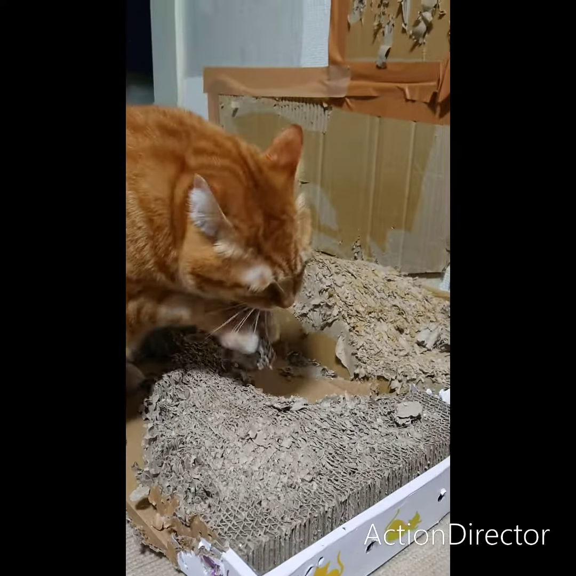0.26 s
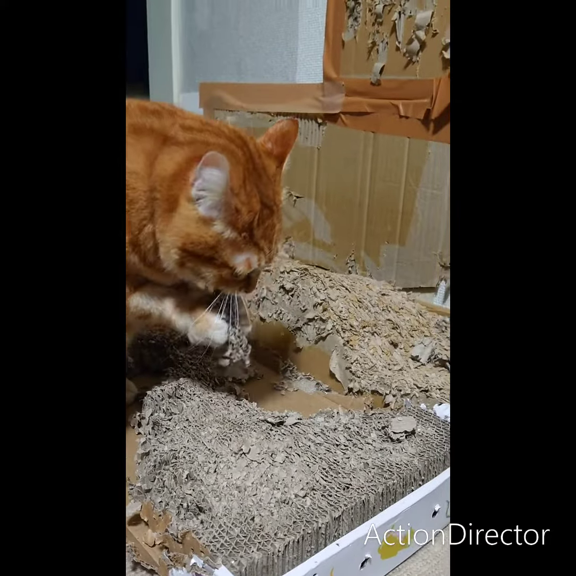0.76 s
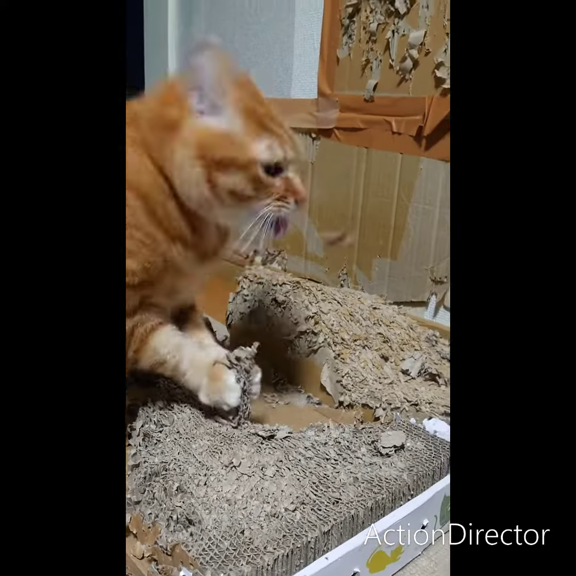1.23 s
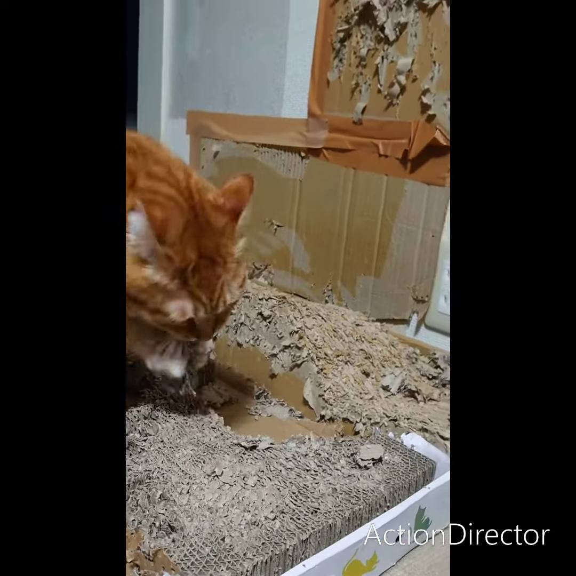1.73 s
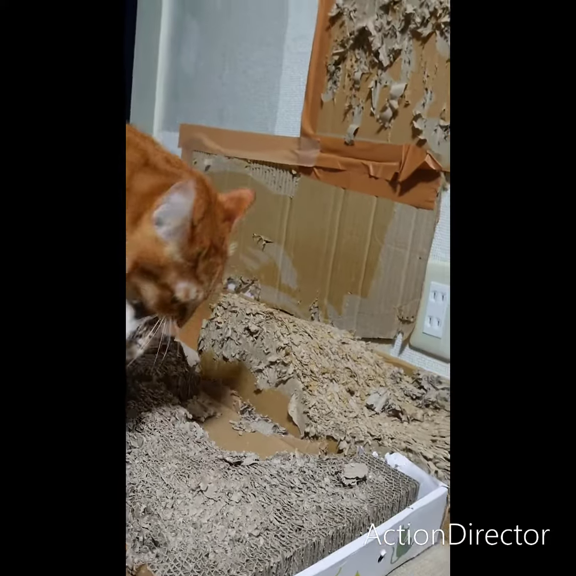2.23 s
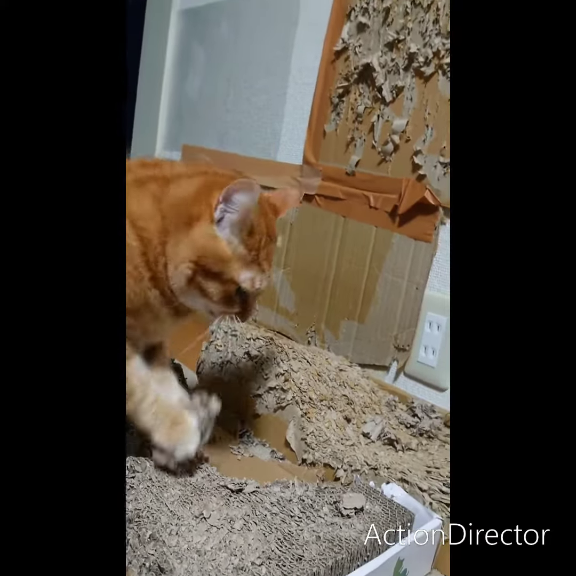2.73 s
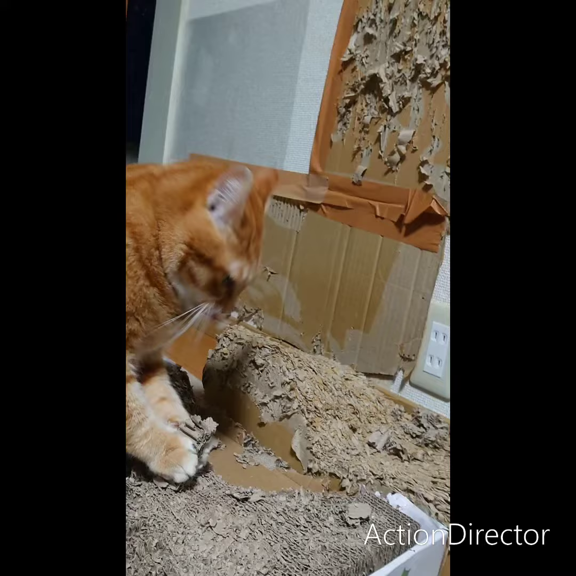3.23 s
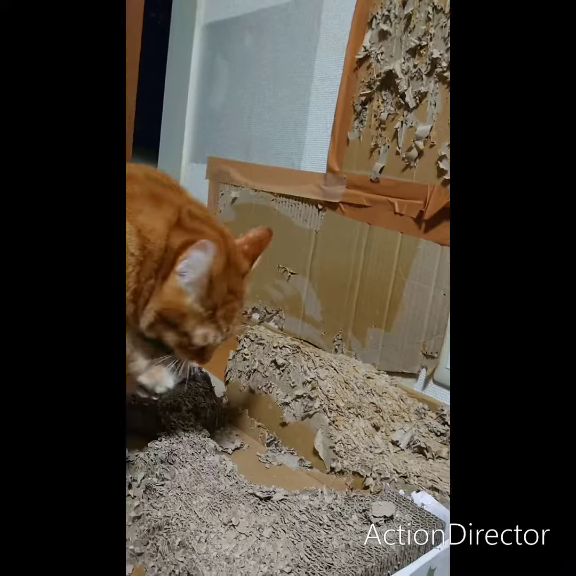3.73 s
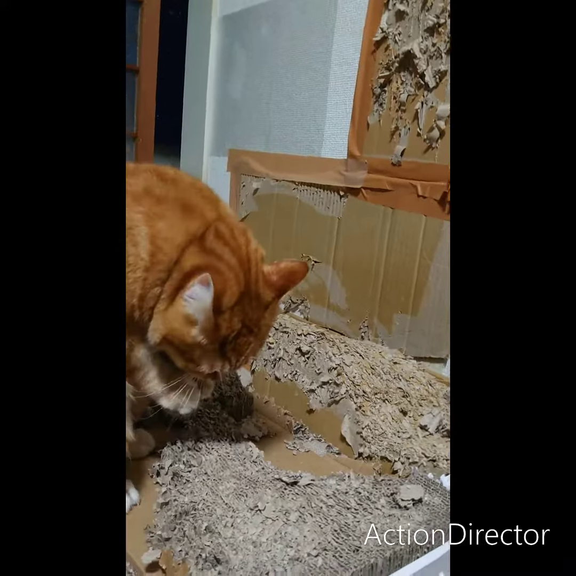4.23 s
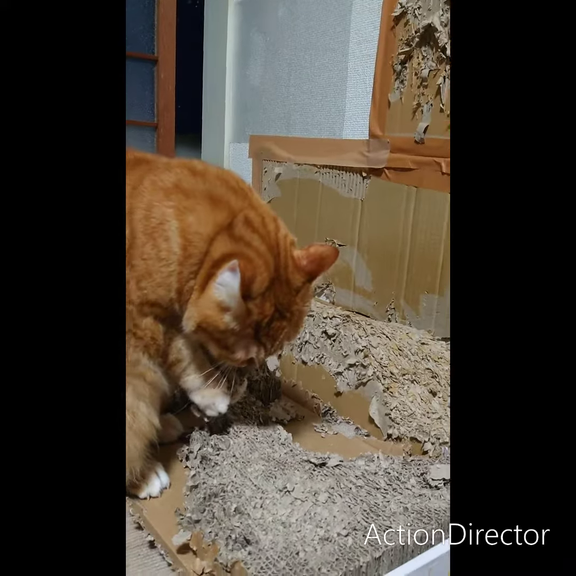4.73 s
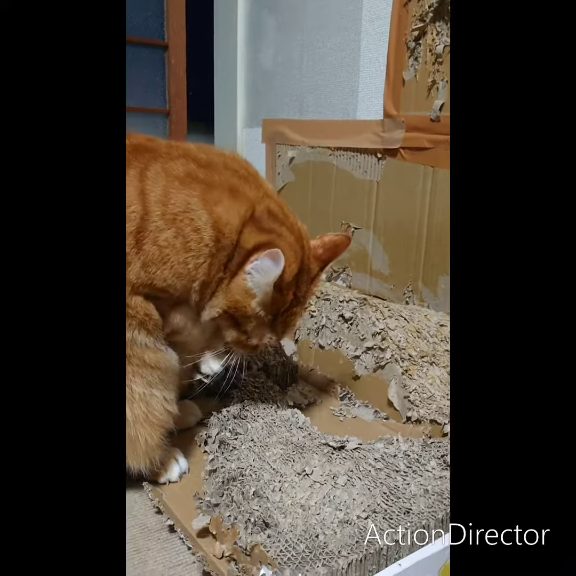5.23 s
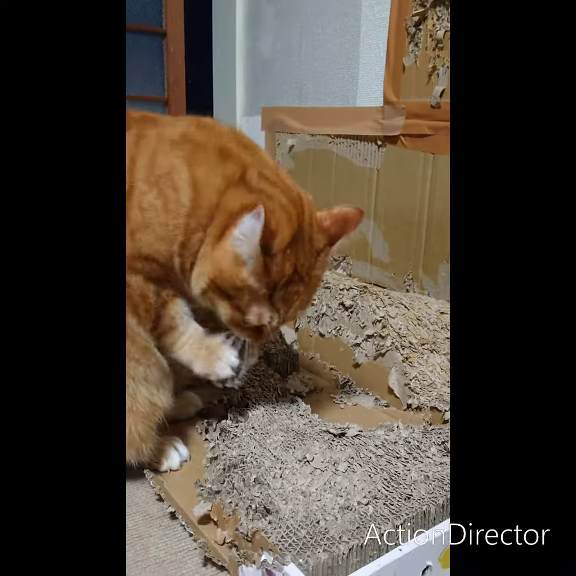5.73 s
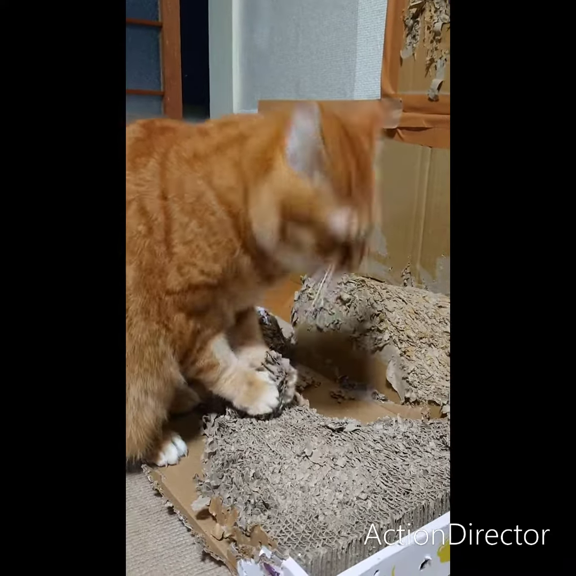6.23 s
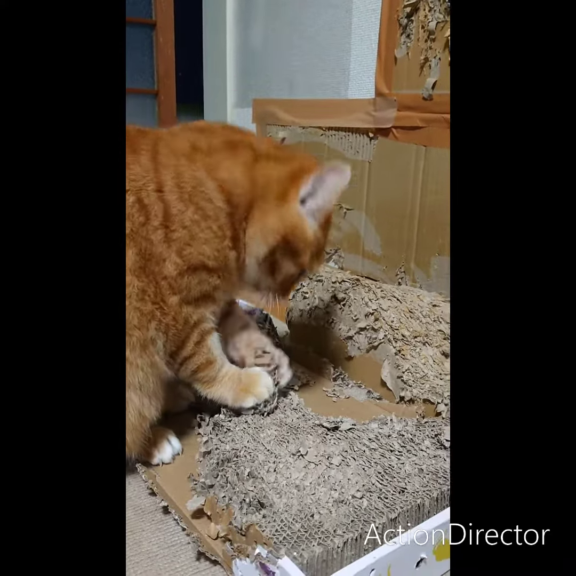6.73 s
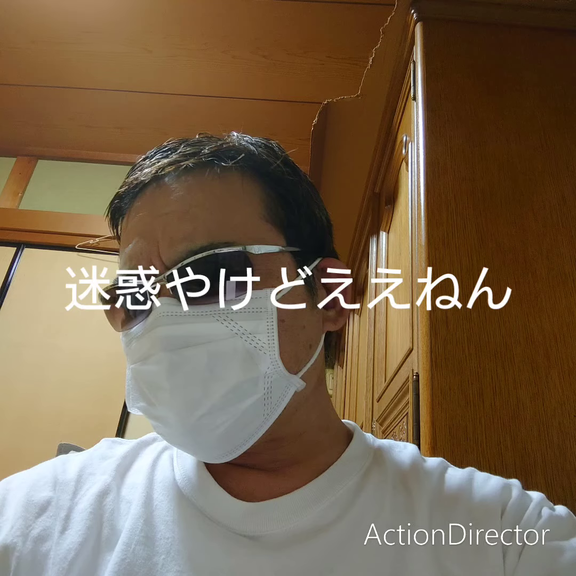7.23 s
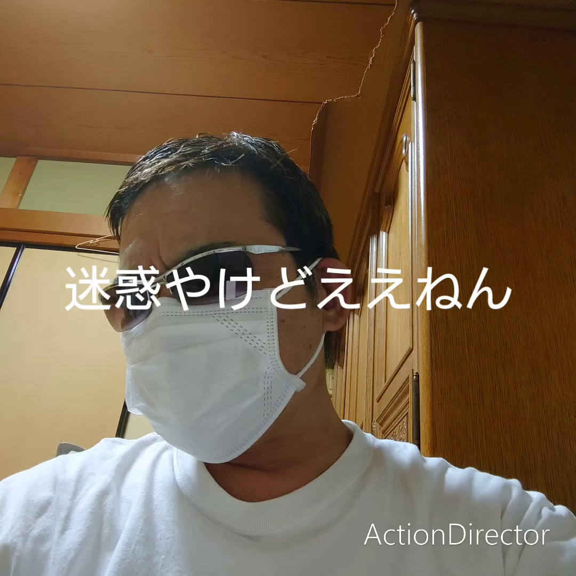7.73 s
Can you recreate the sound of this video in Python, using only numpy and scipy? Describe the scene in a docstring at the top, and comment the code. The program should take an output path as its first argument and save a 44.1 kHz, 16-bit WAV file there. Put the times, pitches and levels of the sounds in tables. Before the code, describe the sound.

Crisp cardboard rips and sharp cracks, papery rustling and a few dull thumps in a small room with low hum, cutting abruptly to silence.

```python
"""A cat bites and claws pieces off a corrugated cardboard scratching pad in a small room.
From the start an appliance hums (wavering sines) in rushing air (shaped noise), and shreds rustle
(clumped random slips). Paper walls snap and rip (bursts of fibre fractures), paws scuff (dull grains),
and from 1.1 s on a paw lands on the hollow pad with a thump (decaying sines).
At 7.24 s the sound is switched off, and silence follows."""
import sys
import numpy as np
from scipy import signal
from scipy.fft import rfft, irfft
from scipy.io import wavfile

SR = 44100
rng = np.random.default_rng(int(sys.argv[2]) if len(sys.argv) > 2 else 0)


def wav_out(sig):
    """Save sig, one row per channel (or a flat mono array), as 16-bit PCM at SR to the path in sys.argv[1]."""
    wavfile.write(sys.argv[1], SR, np.round(np.clip(np.atleast_2d(sig).T, -1, 1) * 32767).astype(np.int16))


N = 351918
OFF_S = 7.242


def from_db(db):
    """Amplitude ratio of a level in dB."""
    return 10 ** (np.asarray(db) / 20)


def rms_one(x):
    """Scale to an RMS of 1."""
    return x / np.sqrt(np.mean(x ** 2) + 1e-20)


def at_hz(points, hz):
    """Read a spectrum on a log-frequency axis."""
    known_hz, values = np.transpose(points)
    return np.interp(np.log(hz + 1e-3), np.log(known_hz), values)


def colour(x, points, share=1, size=8192):
    """Causal (minimum-phase) filter with share times the given dB shape."""
    shape_db = share * at_hz(points, np.fft.rfftfreq(size, 1 / SR))
    cepstrum = irfft(np.log(from_db(shape_db)))
    # fold the cepstrum onto positive time: minimum phase
    cepstrum[1:size // 2] *= 2
    cepstrum[size // 2 + 1:] = 0
    response = irfft(np.exp(rfft(cepstrum)))
    response = response.reshape((1,) * (x.ndim - 1) + (-1,))
    return signal.oaconvolve(x, response, axes=-1)[..., :x.shape[-1]]


def place(pair, tilt):
    """Tilt left against right, frequency by frequency, by 1.202 times the dB in tilt."""
    left = colour(pair[0], tilt, .5)
    right = colour(pair[1], tilt, -0.702)
    return np.array([left, right])


def resonance(x, hz, width_hz):
    """Two-pole band-pass."""
    r = np.exp(-np.pi * width_hz / SR)
    zeros = [(1 - r * r) / 2, 0, (r * r - 1) / 2]
    poles = [1, -2 * r * np.cos(2 * np.pi * hz / SR), r * r]
    return signal.lfilter(zeros, poles, x + 1e-18)


def band_rms(x, low_hz, high_hz):
    """Level of the part of x inside a band."""
    band = signal.butter(2, [low_hz, high_hz], "band", fs=SR, output="sos")
    return np.std(signal.sosfilt(band, x))


def add(track, start_s, sound):
    """Mix a short sound into a track."""
    start = int(start_s * SR)
    track[..., max(start, 0):start + sound.shape[-1]] += sound[..., max(-start, 0):N - start]


def drift(per_s, size=4000):
    """Slow random wander: straight lines between normal draws of spread 1, per_s draws a second."""
    return np.interp(np.arange(N) / SR * per_s, np.arange(size), rng.standard_normal(size))


def two_ways(size, unlike):
    """Crumpled paper radiates unevenly: each fracture reaches left and right with its own strength."""
    return (1 + unlike * rng.standard_normal((2, size))) / np.sqrt(1 + unlike ** 2)


def hum(waver_db=.8, waver_hz=0.421):
    """Steady tones of the appliance's motor and fan, wavering a little in level and speed."""
    # tones: pitch_hz, level_db, left_minus_right_db
    tones = [(31.65, -61, -10), (63.08, -62.5, -3.5), (73.27, -56, -2), (94.7, -61, 1),
             (100.66, -71.5, -5.5), (171.8, -80, 0.5), (261.2, -86, 0.5), (519.2, -85.5, 14),
             (548.04, -79, 22), (585.5, -89, 23)]
    out = np.zeros((2, N))
    for hz, level_db, side_db in tones:
        cycles = np.cumsum(hz + waver_hz * drift(1.98)) / SR
        tone = np.sqrt(2) * np.sin(2 * np.pi * (rng.random() + cycles))
        pan_db = side_db * np.array([[.5], [-.5]])
        out += from_db(level_db + waver_db * drift(3.3) + pan_db) * tone
    return out


def air(level_db=-68.5):
    """Even rush and rumble of moving air, alike on both sides only in the bass."""
    # noise spectrum: freq_hz, relative_db_per_hz
    rush = [(20, 13), (50, 13), (66, 21.5), (90, 11), (125, 8.5), (175, -0.5), (240, -9), (330, -1),
            (550, -0.5), (750, -4.5), (1320, -10), (2100, -10), (5800, -28), (15000, -29.5)]
    # left against right, before the scaling in place(): freq_hz, tilt_db
    air_tilt = [(60, -7.5), (200, -5.5), (380, 3.5), (700, 7.5), (1300, 1), (2400, 7.5), (4400, 3),
                (15000, 3.5)]
    # left-right likeness: freq_hz, likeness_0_to_1
    likeness = [(100, 0.9), (250, .7), (600, .4), (1500, 0), (10000, .05)]
    alike = np.clip(at_hz(likeness, np.fft.rfftfreq(N, 1 / SR)), 0, 1)
    mid, side = rfft(rng.standard_normal((2, N)))
    pair = irfft(np.sqrt(1 + alike) * mid + np.sqrt(1 - alike) * side * [[1], [-1]], N)
    pair = place(colour(pair, rush), air_tilt)
    return from_db(level_db) * pair / band_rms(pair.mean(axis=0), 300, 1500)


def stirring(settle=1.3, rest_rub_db=-85, rest_crackle_db=-90):
    """Gains of rub and crackle: strokes swell, settle more slowly, and add in power where they overlap."""
    # a paw or the chin pushes through the shreds: peak_s, relative_level_db, swell_s, crackle_re_rub_db
    strokes = [ (.01, -65.5, 0.0262, -6), (.36, -78, .035, 2), (.48, -71.5, .05, -3), (.74, -79, .09, -3),
               (1.065, -66.5, 0.0697, -2), (1.209, -64, 0.0177, -2.5), (1.422, -70.5, 0.0414, 0),
               (1.563, -63.5, 0.017, -1), (1.842, -69.5, 0.058, -2.5), (2.029, -67, 0.0723, -12),
               (2.297, -65, 0.0567, -3), (2.517, -63, 0.0696, -2.5), (2.713, -65, 0.0545, -3.5),
               (2.954, -71, 0.027, 0.5), (3.13, -71.5, 0.0339, -1.5), (3.27, -73, .025, -5),
               (3.408, -61.5, 0.0217, -5), (3.62, -75, .07, -3), (3.754, -72.5, 0.022, 13),
               (3.888, -71, 0.082, -3), (4.146, -66.5, 0.051, -16), (4.347, -64.5, 0.0348, -11),
               (4.45, -70.5, 0.0273, 1), (4.63, -70, 0.063, -23.5), (5.108, -67.5, 0.0428, 0.5),
               (5.32, -70, .06, -6), (5.48, -75, .025, 1), (5.771, -66, 0.0677, -7),
               (5.951, -60.5, 0.0278, 1.5), (6.063, -65.5, 0.0182, -4.5), (6.192, -57.5, 0.0262, -3.5),
               (6.458, -72, 0.0335, -4.5), (6.578, -72, 0.0202, -5), (6.865, -59, 0.0249, -2)]
    t = np.arange(0, N, 32) / SR
    # the cat's weight keeps the pile stirring between strokes
    rub, crackle = from_db(rest_rub_db) ** 2, from_db(rest_crackle_db) ** 2
    for s, level_db, swell_s, crackle_db in strokes:
        away = np.maximum(s - t, (t - s) / settle) / swell_s
        push = from_db(level_db) * 2 / (np.exp(np.minimum(away, 20)) + np.exp(-away))
        rub = rub + push ** 2
        crackle = crackle + (push * from_db(crackle_db)) ** 2
    return [np.interp(np.arange(N) / SR, t, np.sqrt(power)) for power in (rub, crackle)]


def grains(per_s, spread_db, smooth, clump_db=2, clumps_per_s=120, unlike=1.0):
    """Countless tiny slips of uneven size, coming in clumps over a smooth rub."""
    slips, clumps = np.zeros((2, N)), drift(clumps_per_s)
    rub = smooth * rng.standard_normal((2, N))
    at = np.flatnonzero(rng.random(N) < per_s / SR)
    sizes_db = spread_db * np.minimum(rng.exponential(1, len(at)), 4) + clump_db * clumps[at]
    signs = rng.choice([-1, 1], len(at))
    slips[:, at] = from_db(sizes_db) * signs * two_ways(len(at), unlike)
    return rms_one(slips) + rub


def rustle(rub_gain, fine_gain, rub_db=-2):
    """Shreds slide over each other, and their loose fibres crackle."""
    # sliding shreds: freq_hz, relative_db_per_hz
    rub_shape = [(150, -13.5), (450, 0), (1000, 1.5), (1500, -8.5), (2500, -5), (3600, -2), (6000, -2.5),
                 (9000, -19.5), (15500, -7)]
    # crackling fibres: freq_hz, relative_db_per_hz
    fine_shape = [(300, -24.5), (1000, -3.5), (2000, -13), (6000, -6.5), (9500, -8), (12000, 0.5),
                  (15500, -2.5)]
    rub = colour(grains(per_s=2200, spread_db=3.5, smooth=0.83), rub_shape)
    fine = colour(grains(per_s=3500, spread_db=4.0, smooth=0.686), fine_shape)
    rub = rub / band_rms(rub[0], 2500, 6500)
    fine = fine / band_rms(fine[0], 9000, 15000)
    return from_db(rub_db) * rub_gain * rub + fine_gain * fine


def ticks(rub_gain, count=400, per_s=11, tick_db=-63, spread_db=2.2, at_rub_db=-70):
    """Faint breaks by chance, more often and louder under a stroke, as rows like the table in snaps().

    per_s and tick_db hold where the rub gain is at_rub_db; count is the number of candidates.
    """
    rate_follows, level_follows = .6, .5  # shares of the rub's swing in dB
    half_s, low_hz, high_hz, crisp_db = .0008, 2402, 6000, -2.5
    when, chance, pitch = rng.random((3, count))
    level, crisp, beam = rng.standard_normal((3, count)) * spread_db
    s = (np.arange(count) + when) / count * OFF_S
    push_db = 20 * np.log10(rub_gain[(s * SR).astype(int)]) - at_rub_db
    rows = np.transpose([s, tick_db + level_follows * push_db + level, np.full(count, half_s),
                         low_hz * (high_hz / low_hz) ** pitch, crisp_db + 2 * crisp, beam])
    kept = chance < per_s * OFF_S / count * from_db(rate_follows * push_db)
    return rows[kept].tolist()


def snaps(faint_breaks, fibres_per_s=7000, spread_db=3.5, ring_width_hz=2200, widen_s=0.005, ring_db=-2,
          crack_db=8.02, shortest_s=0.0019, steepness=0.96, unlike=0.55, scatter_db=-2, scatter_t60_s=0.014,
          size=2048):
    """Each break is a swelling run of fibre fractures: a broad crack plus the short ring of the paper wall."""
    # loudest walls breaking: peak_s, relative_level_db, swell_s, ring_hz, crack_re_ring_db, left_treble_db
    wall_breaks = [ (.433, -53.5, 0.00075, 2400, -5, -4), (.521, -50.5, 0.0014, 2390, -15, 0),
                   (.638, -58, 0.00132, 3600, 0, -3), (1.0633, -33, .00035, 3600, -16, -6),
                   (1.0796, -37.5, .0006, 3800, -3.5, -6), (1.0837, -30.5, 0.00068, 2800, -5, -7),
                   (1.0862, -32, 0.0012, 2910, -4.5, -7), (1.191, -46, 0.00212, 5000, 1, 0),
                   (1.548, -56, .001, 5800, -10, 0), (1.6792, -49, 0.00068, 5550, 0, 2),
                   (1.749, -51, 0.00035, 2580, -20.5, 0), (1.8301, -43.5, 0.00064, 5130, -6, -2),
                   (1.9142, -52.5, 0.00092, 6000, 2, 2), (2.0612, -38, 0.00074, 3200, -18, -3),
                   (2.1551, -50, 0.000555, 3600, 1, -5), (2.2718, -44.5, .0005, 3200, 30, -7),
                   (2.413, -45.5, 0.00212, 4240, -4, 1), (2.4448, -43.5, 0.0016, 4170, -9, -3),
                   (2.4759, -53, .0006, 3400, 1.5, -4), (2.499, -47.5, 0.00089, 4100, -5.5, -4),
                   (2.527, -49, 0.00173, 3740, -6, -4), (2.6546, -51.5, .0012, 5600, 12, -2),
                   (2.664, -53.5, .003, 4500, 0, -3), (2.7503, -30.5, 0.0013, 3200, -1, -7),
                   (2.7548, -38, 0.00107, 5280, -6.5, -6), (2.93, -53.5, 0.00236, 5000, -4, 0),
                   (3.044, -56.5, .001, 3480, -12, 0), (3.4052, -47, 0.00078, 5630, -6.5, 0),
                   (3.5506, -51, .0005, 5200, 5, -6), (3.5931, -56.5, 0.00043, 5370, 1, 0),
                   (3.9012, -44.5, 0.00053, 5920, -2, -8), (4.402, -57, 0.0039, 4400, -1, -4),
                   (4.468, -49, 0.004, 3100, 1, -7), (5.0556, -54.5, .0005, 5900, 6, 1.5),
                   (5.1103, -50.5, 0.00164, 6200, 8, 3), (5.1652, -46.5, 0.00157, 6400, 2, 4),
                   (5.313, -52, .0015, 1700, -12, 0), (5.7562, -30.5, .0014, 3400, -27, 0),
                   (5.7635, -24.5, .00025, 3400, -26, 0), (5.7868, -48, .0022, 3400, 2.5, 0),
                   (5.8458, -35.5, 0.000525, 3200, -16, 0), (5.8615, -49.5, 0.00055, 4500, 21, 0),
                   (5.9276, -54, 0.00098, 4800, 1, 0), (5.953, -49.5, .005, 5000, 6, 4),
                   (5.981, -43.5, 0.00063, 3688, -6, 0), (6.134, -55.5, 0.0021, 4400, 0.5, 0),
                   (6.172, -38, 0.00264, 3800, 1, -4), (6.184, -32, .0012, 2250, -17, 2),
                   (6.332, -55.5, 0.00084, 5900, -10.5, 0), (6.5596, -50.5, 0.000387, 5100, -14, 0),
                   (6.8354, -45, .001, 4700, -12.5, 3), (6.8485, -44, .0007, 6000, -8, 3),
                   (6.8646, -54, .0012, 5200, 7, 0), (6.8848, -50, 0.0019, 3485, -3, 0)]
    # crack spectrum: freq_hz, relative_db_per_hz
    crack_shape = [(150, -12), (500, -9), (1000, -6.5), (1400, -9), (2200, -1.5), (3600, 3), (5000, -1),
                   (6300, 0.5), (9500, -2), (12000, 3), (15500, -1.5)]
    # only the top of a crack is beamed: freq_hz, share_0_to_1
    beam_shape = [(6000, 0), (9500, 1)]
    ring, crack = np.zeros((2, 2, N))
    t = (np.arange(size) - size / 2) / SR
    scatter_decay = from_db(-60 * np.arange(size // 2) / SR / scatter_t60_s)
    scatter_decay = scatter_decay / np.linalg.norm(scatter_decay)
    for s, level_db, swell_s, hz, crisp_db, beam_db in wall_breaks + faint_breaks:
        crisp = from_db(crisp_db)
        sizes = from_db(spread_db * rng.standard_normal(size)) * rng.choice([-1, 1], size)
        fractures = sizes * (rng.random(size) < fibres_per_s / SR) * two_ways(size, unlike)
        fractures[:, size // 2] = 2  # the wall itself gives way
        fractures /= np.cosh(t / swell_s * steepness)  # fibres go one by one, most at the height
        # the flutes and boxes around scatter each break along paths of its own
        paths = from_db(scatter_db) * rng.standard_normal((2, size // 2)) * scatter_decay
        paths[:, 0] = 1
        fractures = signal.fftconvolve(fractures, paths, axes=1)[:, :size]
        strength = from_db(level_db) * np.sqrt((shortest_s + swell_s) * SR / (1 + crisp ** 2))
        # a long, crisp rip runs through walls of many sizes, so its ring is broader
        width_hz = ring_width_hz * (1 + crisp * swell_s / widen_s)
        wall = resonance(resonance(fractures, hz, width_hz), hz, 2 * width_hz)
        start_s = s - size / 2 / SR
        add(ring, start_s, strength * wall / np.linalg.norm(wall))
        left, right = strength * crisp * fractures / np.linalg.norm(fractures)
        add(crack, start_s, np.array([colour(left, beam_shape, beam_db, size=256), right]))
    return from_db(ring_db) * ring + from_db(crack_db) * colour(crack, crack_shape)


def scuffs():
    """Short, dull rasps: paws slip over the cut edges, or the pad's body gives way under a big rip."""
    # bell-shaped drags: peak_s, relative_level_db, sigma_s
    drags = [(0.42, -80, 0.022), (1.083, -49.5, 0.0018), (1.2, -60.5, 0.0134), (1.563, -63, 0.0067),
             (2.055, -64, 0.0172), (2.756, -49, 0.00214), (2.931, -61.5, 0.0124), (3.402, -55, 0.0122),
             (4.459, -62.5, 0.0102), (5.33, -69, .02), (6.186, -43.5, 0.0029), (6.206, -55.5, 0.021),
             (6.871, -60.5, 0.0222)]
    # rasp spectrum: freq_hz, relative_db_per_hz
    rasp_shape = [(150, -13.5), (400, -1), (1100, 4), (1600, 0), (2200, -5.5), (5000, -14), (12000, -30)]
    force, t = np.zeros(N), np.arange(-SR // 10, SR // 10) / SR
    for s, level_db, sigma_s in drags:
        add(force, s + t[0], from_db(level_db) * np.exp(-.5 * (t / sigma_s) ** 2))
    return force * rms_one(colour(grains(per_s=3000, spread_db=9.5, smooth=.5), rasp_shape))


def thumps(contact_hz=900):
    """A padded paw sets the hollow pad and the floor under it ringing; the soft contact dulls the top."""
    # soft blows: start_s, relative_level_db, ring_t60_s
    blows = [(1.086, -53.5, 0.16), (1.193, -52, 0.33), (2.056, -44.5, 0.267), (2.753, -50, 0.204),
             (2.928, -46.5, 0.213), (6.1866, -24, .24), (6.219, -35, 0.114), (6.844, -44.5, 0.328)]
    # modes of the hollow pad: mode_hz, relative_level_db, share_of_ring_t60
    modes = [(69.7, 2, 0.94), (91, -8, 1), (128, -20.5, .6), (185.5, -23, .6), (336, -12, 0.27),
             (393, -10, 0.16), (790, -20, 0.22), (896, -20.5, 0.2)]
    out, t = np.zeros(N), np.arange(SR // 2) / SR
    for s, level_db, t60_s in blows:
        for hz, db, share in modes:
            decay = from_db(level_db + db - 60 * t / (t60_s * share))
            add(out, s, decay * np.sin(2 * np.pi * hz * t))
    return signal.sosfilt(signal.butter(1, contact_hz, fs=SR, output="sos"), out)


def room(x, tail_db=(-6, -11), t60_s=0.16, build_s=0.0028, wall_hz=9000):
    """A soft tail from the walls; the left side, turned away from the cat, hears more of it."""
    t, out = np.arange(SR // 2) / SR, []
    soften = signal.butter(1, wall_hz, fs=SR, output="sos")
    for near, level_db in zip(x, tail_db):
        tail = rng.standard_normal(len(t)) * from_db(-60 * t / t60_s) * (1 - np.exp(-t / build_s))
        tail = signal.sosfilt(soften, tail / np.linalg.norm(tail))
        out.append(near + from_db(level_db) * signal.fftconvolve(near, tail)[:N])
    return np.array(out)


def scene(paper_db=-1.0):
    """Cardboard close to the microphone, the appliance behind."""
    # left against right, before the scaling in place(): freq_hz, tilt_db
    cat_tilt = [(100, -4.5), (600, 2.5), (1300, -4), (2400, -7), (4400, -8), (9000, -16), (14000, 0)]
    background = hum() + air()
    rub_gain, fine_gain = stirring()
    paper = rustle(rub_gain, fine_gain) + snaps(ticks(rub_gain)) + scuffs()
    cat = from_db(paper_db) * room(paper) + thumps()
    return place(cat, cat_tilt) + background


def record(dry, fade_s=0.0123, cutoff_hz=15600):
    """Microphone colour, the switch-off, and a steep top cut."""
    # the microphone's narrow treble dip: freq_hz, gain_db
    mic_shape = [(6600, -1), (7200, -17), (8300, -18), (8800, -10.5), (9500, -1)]
    running = np.clip((OFF_S - np.arange(N) / SR) / fade_s + .5, 0, 1)
    top_cut = signal.ellip(10, .2, 90, cutoff_hz, fs=SR, output="sos")
    return signal.sosfilt(top_cut, colour(dry, mic_shape) * running)


dry = scene()
out = record(dry)
wav_out(out)
```